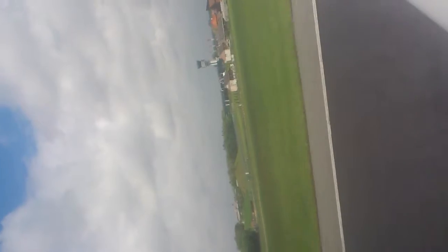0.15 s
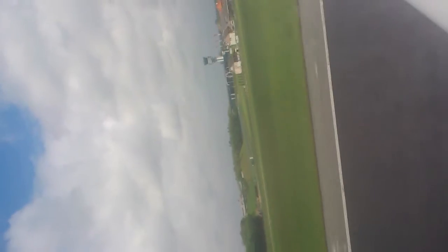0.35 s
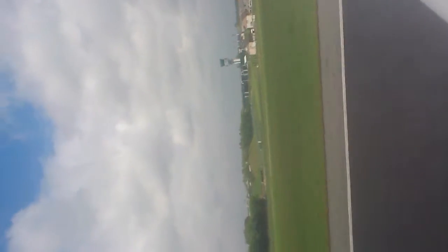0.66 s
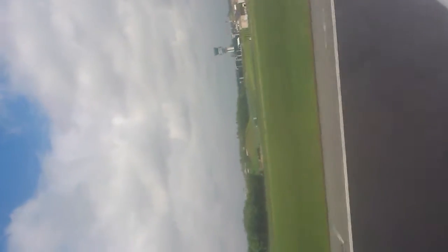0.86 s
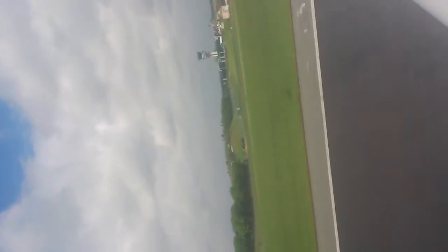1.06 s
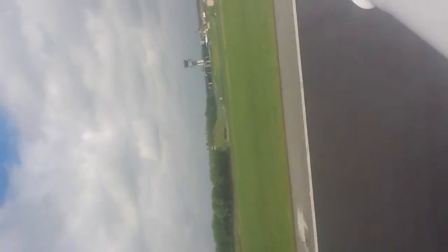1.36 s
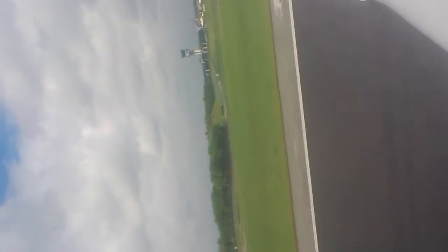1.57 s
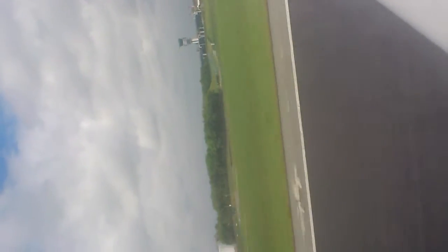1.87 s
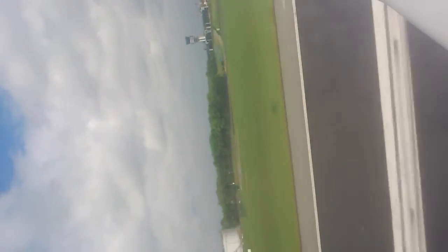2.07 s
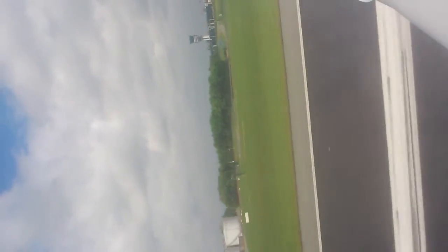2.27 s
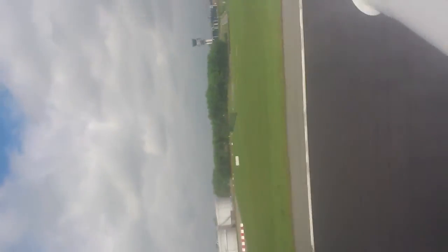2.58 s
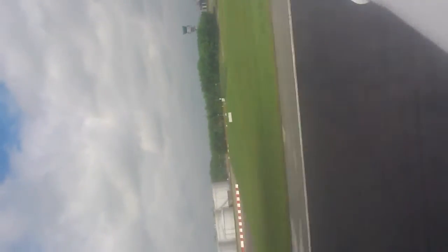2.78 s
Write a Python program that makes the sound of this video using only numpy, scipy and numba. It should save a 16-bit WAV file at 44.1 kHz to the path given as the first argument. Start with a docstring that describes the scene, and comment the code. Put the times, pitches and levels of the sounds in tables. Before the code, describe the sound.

Heavy low wheel rumble and undercarriage shudder of an airliner rolling on a runway, heard close at a window seat, with hull booms, air hiss, a faint falling whine, rattling trim and a sharp late clack.

```python
"""Wheel rumble and an undercarriage shudder fill an airliner cabin rolling out, heard at the window seat.
Hull resonances boom as gliding sines; engine roar and air hiss are filtered noise, whistles wavering sines.
Moving narrow bands of noise make the falling whines, and fixed ones the squeaks.
Gritty noise bursts rattle the trim; a close fitting clacks as struck modes near the end.
A fast limiter follows the low sound and ducks everything, hiss included, when it peaks."""
import sys
import numpy as np
from scipy import signal
from scipy.fft import rfft, irfft
from scipy.io import wavfile
from scipy.ndimage import uniform_filter1d, minimum_filter1d
from numba import njit

SR = 44100
rng = np.random.default_rng(int(sys.argv[2]) if len(sys.argv) > 2 else 0)


def transcribe(u):
    """Save the signal u as a 16-bit wav file named by the first command-line argument.

    u: samples, shape (n,) or (channels, n), limited to [-1, 1]; the rate is SR.
    q: integer samples, one column per channel.
    """
    v = np.clip(np.atleast_2d(u).T, -1, 1)
    q = np.round(v * 32767).astype(np.int16)
    wavfile.write(sys.argv[1], SR, q)


N = 129654  # length in samples

# All source levels are those ahead of the limiter; spectra are relative.
# Wheel rumble spectrum: f/Hz, density/dB per Hz
RUMBLE_SPECTRUM = [(15, -37.5), (28, -3), (40, -24.5), (60, -2.5), (80, -0.5), (120, 1), (170, -2.5),
                   (250, -9), (345, -11.5), (430, -20.5), (540, -28), (740, -34.5), (1000, -38.5),
                   (1500, -55.5), (2500, -56), (6000, -84.5)]
# Wheel rumble over time: t/s, level/dB
RUMBLE_LEVEL = [(0, -22.5), (.49, -22), (.58, -13.5), (.82, -15.5), (.95, -18.5), (1.25, -21.5),
                (1.45, -11.5), (1.75, -11.5), (1.9, -11.5), (2.3, -20.5), (2.55, -20), (2.94, -21.5)]
# Undercarriage shudder over time: t/s, level/dB
SHUDDER_LEVEL = [(0, -26.5), (.1, -20), (.25, -34.5), (.41, -18.5), (.52, -29), (.6, -19), (.73, -18.5),
                 (.82, -21), (.92, -20.5), (1.15, -21.5), (1.42, -22), (1.6, -19), (1.78, -15),
                 (1.9, -18.5), (2.05, -15.5), (2.37, -20), (2.6, -17), (2.94, -25)]
SHUDDER_HZ, SHUDDER_WANDER = 52.83, 0.1227  # wander is a fraction of the pitch
SHUDDER_WAVER_DB = 2

# Engine roar spectrum: f/Hz, density/dB per Hz
ROAR_SPECTRUM = [(200, -8.5), (380, 4.5), (480, 2.5), (600, 0), (750, 4.5), (900, -8), (1200, -12),
                 (2400, -38.5)]
# Engine roar over time: t/s, level/dB
ROAR_LEVEL = [(0, -37.5), (.35, -37.5), (.6, -35.5), (.9, -41), (1.06, -36.5), (1.3, -42), (1.45, -35.5),
              (1.8, -40.5), (1.87, -29), (2.02, -39.5), (2.3, -39.5), (2.55, -59), (2.74, -37), (2.94, -58)]
# Thin engine whistles: start t/s, length/s, f/Hz, level/dB
ENGINE_WHISTLES = [(.07, .19, 4247, -53), (.21, .13, 3580, -57), (.25, .18, 4371, -55.5),
                   (.92, .31, 4334, -52.5)]
WHISTLE_EDGE_S, WHISTLE_WANDER, WHISTLE_WAVER_DB = .035, .002, 2.5  # wander is a fraction of the pitch

# Hull booms: start t/s, length/s, start f/Hz, end f/Hz, level/dB
HULL_BOOMS = [(0.092, 0.21, 109, 142.7, -24), (0.265, 0.1, 319, 350, -26), (.513, 0.2, 172, 169.7, -14),
              (0.746, 0.15, 182, 169.5, -20.5), (1.35, 0.21, 147.3, 125, -19.5),
              (1.394, 0.3045, 117, 102.8, -8.5), (2.086, 0.45, 216, 215.7, -29),
              (2.758, 0.13, 168, 173.8, -23.5)]
BOOM_EDGE_S, BOOM_WANDER, BOOM_WAVER_DB = 0.049, 0.0357, 1.2  # wander is a fraction of the pitch

# Falling whine: t/s, f/Hz, level/dB, width/Hz
MAIN_WHINE = [(0, 15200, -52, 1380), (.5, 14900, -55.5, 1383), (.9, 14700, -53.5, 1170),
              (1.1, 14250, -50, 823), (1.3, 13160, -55.5, 696), (1.55, 13500, -72, 867),
              (1.72, 11500, -53, 870), (1.88, 10960, -46.5, 799), (2.1, 10420, -52, 403),
              (2.3, 9960, -54.5, 373), (2.54, 9600, -55, 340), (2.66, 9600, -68, 345),
              (2.94, 8800, -94, 352)]
# Upper whine: t/s, f/Hz, level/dB
HIGH_WHINE = [(0, 16300, -62), (1.15, 15700, -61), (1.3, 15500, -53), (1.5, 14200, -61), (1.75, 13300, -55),
              (1.92, 13500, -58), (2.05, 13470, -94), (2.94, 12300, -98)]
SKIRT_RATIO, SKIRT_LEVEL_DB = 3.6, -2  # skirt width as a multiple of the whine's, and its relative level
WHINE_FLUTTER_DB = 1.2

# Faint trim squeaks: start t/s, length/s, f/Hz, level/dB, width/Hz
TRIM_SQUEAKS = [(.035, .05, 3250, -49, 300), (.68, .03, 5300, -48, 300), (.765, .06, 6200, -48, 300),
                (.775, .07, 5512, -51, 120), (.77, .08, 5200, -52, 150)]

# Modes of the loose fitting: f/Hz, relative level before tilt/dB, 60 dB decay/s
FITTING_MODES = [(1890, -1, .025), (2070, -4, .02), (2420, 1, .035), (3354, -10, .02), (4250, 1, .013),
                 (4646, 7, .011), (5000, 1, .011), (5685, -5, .02), (6000, 2, .011), (7930, -18, .015)]
# Knocks of the fitting: t/s, peak level/dB, tilt/dB per octave
FITTING_KNOCKS = [(2.6812, -12.5, 5), (2.6872, -23, -4), (2.7165, -32, -8), (2.7258, -26.5, -7),
                  (2.7385, -31, -7)]
CLACK_CONTACT_S, CLACK_GRIT_DB = .0007, -22

# Air rushing along the hull, spectrum: f/Hz, density/dB per Hz
RUSH_SPECTRUM = [(200, 1.5), (450, -1), (750, 3), (1200, -0.5), (1850, -1.5), (2300, -10.5), (2900, -12.5),
                 (3600, -12.5), (4400, -9.5), (5200, -14), (6300, -15), (7800, -16.5), (9000, -26),
                 (10500, -24.5), (12500, -37), (16000, -59)]
# Air rush over time: t/s, level/dB
RUSH_LEVEL = [(0, -39.5), (.5, -39), (.6, -39), (.75, -36), (1.05, -40), (1.3, -40.5), (1.5, -38),
              (1.75, -39), (1.88, -37.5), (2.1, -42.5), (2.45, -47.5), (2.6, -43), (2.94, -48.5)]
# Gain on the top of the air rush: t/s, level/dB
RUSH_TOP_GAIN = [(0, 7), (1.3, 4.5), (1.9, -43.5), (2.3, -20), (2.94, -32)]
RUSH_TOP_HZ, RUSH_FLUTTER_DB = 8700, 2
GRAIN_PER_S, GRAIN_SPREAD_DB, GRAIN_DB = 680, 2.5, -4.5

# Trim rattles: t/s, burst level before the trim filter/dB, ring (decay to 1/e)/s
TRIM_RATTLES = [(.507, -34, .007), (.517, -35, .0046), (.653, -29, .0028), (.692, -32, .005),
                (.761, -35, .016), (.813, -38, .03), (1.018, -29.5, .007), (1.066, -35, .004),
                (1.093, -36, .0068), (1.162, -36, .0054), (1.257, -32, .0055), (1.37, -37, .014),
                (1.407, -35, .008), (1.706, -40, .005), (1.863, -39, .024), (1.987, -38, .0074),
                (2.108, -39, .005), (2.171, -41, .012), (2.433, -42, .004), (2.566, -42, .0075),
                (2.614, -41, .025), (2.643, -39, .015), (2.655, -33, .01), (2.684, -33, .02),
                (2.716, -33, .004), (2.725, -33, .0031), (2.738, -34, .017), (2.799, -40, .016),
                (2.848, -34, .004), (2.9, -37, .005)]
# Body of the trim, spectrum: f/Hz, density/dB per Hz
TRIM_SPECTRUM = [(300, -8), (1000, 9), (1500, 6), (2300, 9.5), (3000, 2), (4400, 8), (6000, 4), (8000, -2),
                 (11000, -16), (16000, -38)]
RATTLE_RISE_S = 0.00032

CABIN_T60_S, CABIN_DB = .12, -9  # decay, and reflections relative to the direct sound
CEILING_DB, LOOKAHEAD_S, RELEASE_S, SENSE_HZ = -16, 0.0013, 0.018, 1540
TOP_HZ = 15850


def undb(db):
    """Decibels to gain."""
    return 10 ** (np.asarray(db) / 20)


def unit(x):
    """Scale to rms 1."""
    return x / np.sqrt(np.mean(x ** 2) + 1e-20)


def curve(rows, axis=1):
    """One column of a time table, joined by straight lines."""
    rows = np.array(rows, float)
    return np.interp(np.arange(N) / SR, rows[:, 0], rows[:, axis])


def colour(x, points):
    """Causal minimum-phase filter through (Hz, dB) points that keeps the power of white noise."""
    hz, db = np.array(points, float).T
    size = 2 ** 18
    f = np.maximum(np.arange(size // 2 + 1) * SR / size, 1)
    magnitude = unit(undb(np.interp(np.log(f), np.log(hz), db)))
    # Folding the cepstrum onto positive time makes the filter causal.
    cepstrum = irfft(np.log(magnitude))
    cepstrum[1:size // 2] *= 2
    cepstrum[size // 2 + 1:] = 0
    response = np.exp(rfft(cepstrum))
    return irfft(rfft(x, size) * response)[:N]


def walk(rate):
    """Smooth random motion with spread 1, up to about rate changes a second."""
    f = np.arange(N // 2 + 1) * SR / N
    spectrum = rfft(rng.standard_normal(N)) * np.exp(-.5 * (f / rate) ** 2)
    return unit(irfft(spectrum, N))


def phase_of(hz):
    """Running phase of a moving pitch, from a random start."""
    return 2 * np.pi * (np.cumsum(hz * np.ones(N)) / SR + rng.random())


def narrow(hz, width_hz):
    """A narrow band of noise, two random walks on a carrier, whose pitch and width may move."""
    width = width_hz * np.ones(N)
    clock = np.cumsum(width / width.max())  # the walks run slower where the band is narrower
    phase = phase_of(hz)
    a, b = (np.interp(clock, np.arange(N), walk(width.max() / 2)) for _ in range(2))
    return unit(a * np.cos(phase) + b * np.sin(phase))


def wheels():
    """Broad noise for the wheel rumble, and a low wandering sine for the undercarriage shudder."""
    rumble = unit(colour(rng.standard_normal(N), RUMBLE_SPECTRUM)) * undb(curve(RUMBLE_LEVEL))
    hz = SHUDDER_HZ * (1 + SHUDDER_WANDER * walk(11.86))
    shudder = unit(np.sin(phase_of(hz)) * undb(SHUDDER_WAVER_DB * walk(18.0)))
    return rumble + shudder * undb(curve(SHUDDER_LEVEL))


def engines():
    """Exhaust noise roars through the wall; thin, wavering whistles come and go."""
    t = np.arange(N) / SR
    out = unit(colour(rng.standard_normal(N), ROAR_SPECTRUM)) * undb(curve(ROAR_LEVEL))
    for start, length, hz, db in ENGINE_WHISTLES:
        swell = np.clip(np.minimum(t - start, start + length - t) / WHISTLE_EDGE_S, 0, 1)
        pitch = hz * (1 + WHISTLE_WANDER * walk(26))
        tone = unit(np.sin(phase_of(pitch)) * undb(WHISTLE_WAVER_DB * walk(15)))
        out += undb(db) * swell * tone
    return out


def booms():
    """Hull resonances swell, glide a little in pitch and die away."""
    t, out = np.arange(N) / SR, np.zeros(N)
    for start, length, hz0, hz1, db in HULL_BOOMS:
        edges = np.minimum(t - start, start + length - t) / BOOM_EDGE_S
        swell = np.sin(np.pi / 2 * np.clip(edges, 0, 1))
        glide = np.interp(t, [start, start + length], [hz0, hz1])
        hz = glide * (1 + BOOM_WANDER * walk(25.3))
        tone = unit(np.sin(phase_of(hz)) * undb(BOOM_WAVER_DB * walk(10.0)))
        out += undb(db) * swell * tone
    return out


def whine():
    """Two breathy whines, narrow bands of noise, fall in pitch and flutter together."""
    hz, width = curve(MAIN_WHINE), curve(MAIN_WHINE, axis=3)
    core = narrow(hz, width)
    skirt = undb(SKIRT_LEVEL_DB) * narrow(hz, SKIRT_RATIO * width)
    main = unit(core + skirt) * undb(curve(MAIN_WHINE, axis=2))
    upper = narrow(curve(HIGH_WHINE), width_hz=870) * undb(curve(HIGH_WHINE, axis=2))
    return (main + upper) * undb(WHINE_FLUTTER_DB * walk(25))


def squeaks():
    """Panels rub and sing briefly, each a narrow band under a half-sine swell."""
    t, out = np.arange(N) / SR, np.zeros(N)
    for start, length, hz, db, width in TRIM_SQUEAKS:
        swell = np.sin(np.pi * np.clip((t - start) / length, 0, 1))
        out += undb(db) * swell * narrow(hz, width)
    return out


def clack():
    """A hard fitting rings its modes at a sharp knock, then bounces with duller blows."""
    t, out = np.arange(N) / SR, np.zeros(N)
    for start, peak_db, tilt in FITTING_KNOCKS:
        ring = np.zeros(N)
        for k, (hz, db, t60) in enumerate(FITTING_MODES):
            gain = (-1) ** k * undb(db + tilt * np.log2(hz))  # neighbouring modes start opposed
            ring += gain * np.sin(2 * np.pi * hz * t) * np.exp(-np.log(1000) * t / t60)
        # The blow is one click with a short gritty contact behind it.
        fade = (t >= start) * np.exp(-np.abs(t - start) / CLACK_CONTACT_S)
        contact = undb(CLACK_GRIT_DB) * rng.standard_normal(N) * fade
        contact[int(start * SR)] += 1
        knock = signal.fftconvolve(contact, ring)[:N]
        out += undb(peak_db) * knock / np.abs(knock).max()
    return out


def air():
    """Fluttering noise peppered with tiny trim ticks; its top sinks, then partly returns."""
    sizes = undb(GRAIN_SPREAD_DB * np.minimum(rng.exponential(size=N), 4))
    struck = rng.random(N) < GRAIN_PER_S / SR
    ticks = unit(struck * sizes * rng.choice([-1, 1], N))
    hiss = rng.standard_normal(N) * undb(RUSH_FLUTTER_DB * walk(76))
    rush = unit(colour(hiss + undb(GRAIN_DB) * ticks, RUSH_SPECTRUM))
    lowpass = signal.butter(4, RUSH_TOP_HZ, fs=SR, output="sos")
    dull = signal.sosfiltfilt(lowpass, rush)
    top = (rush - dull) * undb(curve(RUSH_TOP_GAIN))
    return (dull + top) * undb(curve(RUSH_LEVEL))


def rattles():
    """Loose panels chatter: short gritty bursts of noise coloured by the body of the trim."""
    t, force = np.arange(N) / SR, np.zeros(N)
    for start, db, ring in TRIM_RATTLES:
        slope_s = np.where(t < start, RATTLE_RISE_S, ring)
        force += undb(db) * np.exp(-np.abs(t - start) / slope_s)
    grit = unit(rng.standard_normal(N) * undb(1.66 * walk(410)))
    return colour(force * grit, TRIM_SPECTRUM)


def cabin(x):
    """Dense short reflections from the wall and seats, a decaying noise tail."""
    t = np.arange(N) / SR
    tail = rng.standard_normal(N) * np.exp(-np.log(1000) * t / CABIN_T60_S)
    wet = signal.fftconvolve(x, tail / np.linalg.norm(tail))[:N]
    return (x + undb(CABIN_DB) * wet) / np.hypot(1, undb(CABIN_DB))


def scene():
    """The mix at the window seat: only air and rattles get cabin reflections; the fitting is close by."""
    direct = wheels() + engines() + booms() + whine() + squeaks() + clack()
    return (direct + cabin(air() + rattles()))[None]


@njit
def hold(x, keep):
    """Peak follower: jumps up at once and falls back exponentially."""
    y, e = np.empty(len(x)), 0.
    for i in range(len(x)):
        e = max(x[i], e * keep)
        y[i] = e
    return y


def record(dry):
    """One microphone channel: a fast limiter driven by the low sound, then a steep cut of the top."""
    sense = signal.butter(2, SENSE_HZ, fs=SR, output="sos")
    low = signal.sosfiltfilt(sense, dry[0])
    peak = hold(np.abs(low), np.exp(-1 / (RELEASE_S * SR)))
    gain = 1 / np.maximum(peak / undb(CEILING_DB), 1)
    # The gain dips ahead of each peak and is smoothed over the same span.
    span = max(int(2 * LOOKAHEAD_S * SR), 1)
    gain = uniform_filter1d(minimum_filter1d(gain, span), span)
    top_cut = signal.ellip(10, .2, 80, TOP_HZ, fs=SR, output="sos")
    return signal.sosfilt(top_cut, dry * gain)


dry = scene()
out = record(dry)
transcribe(out)
```